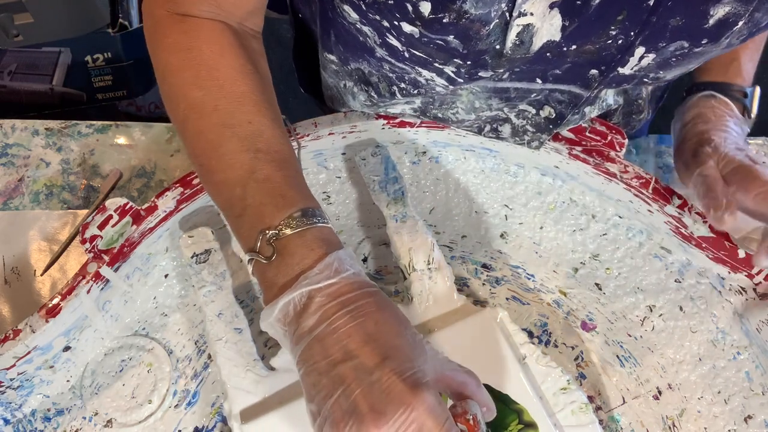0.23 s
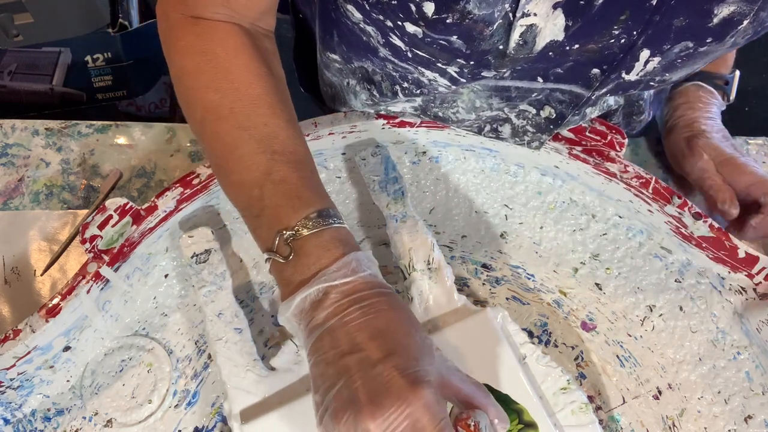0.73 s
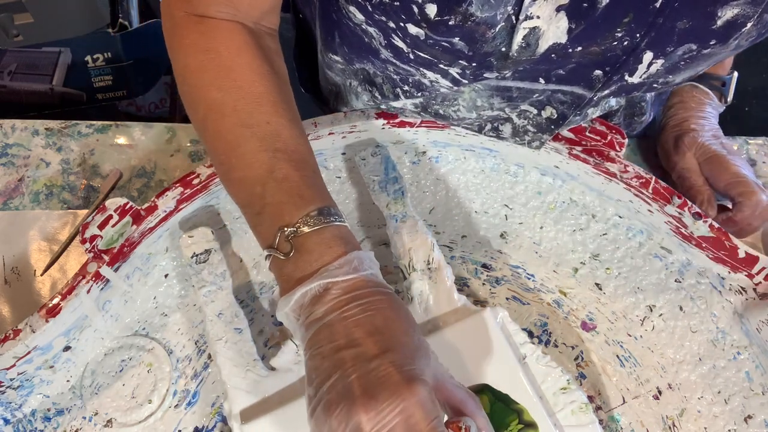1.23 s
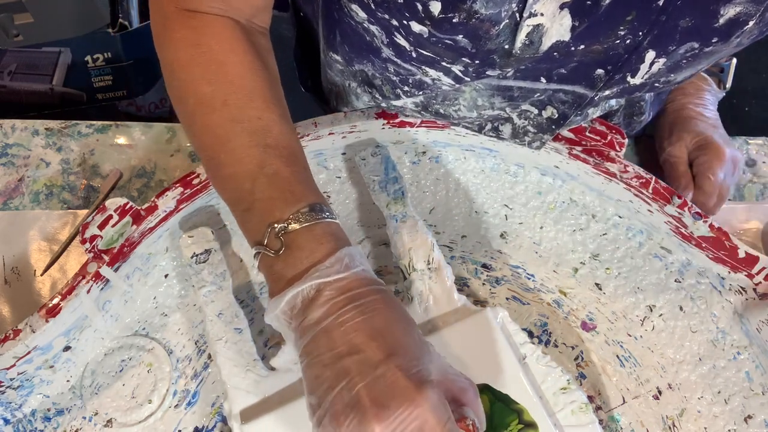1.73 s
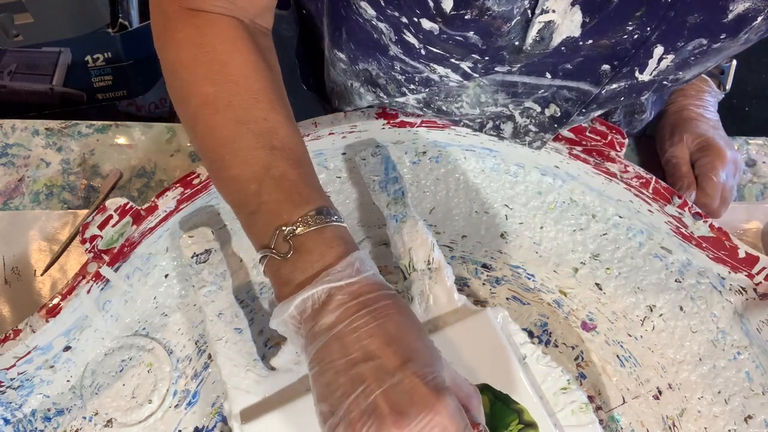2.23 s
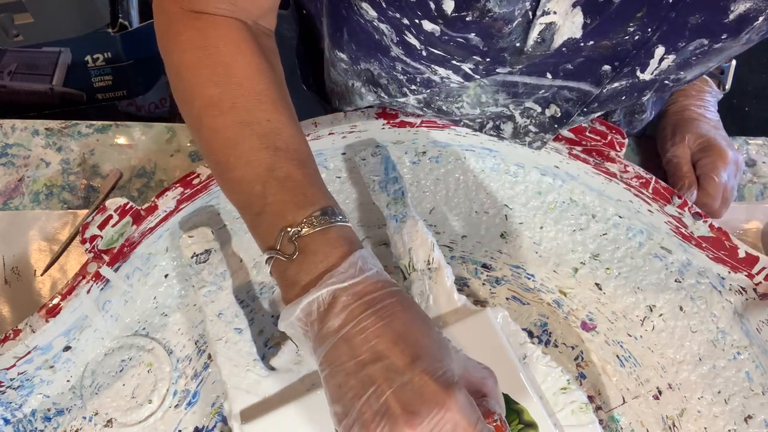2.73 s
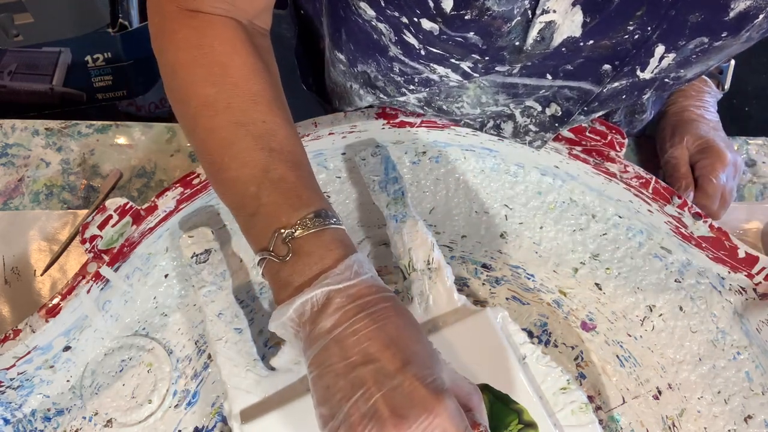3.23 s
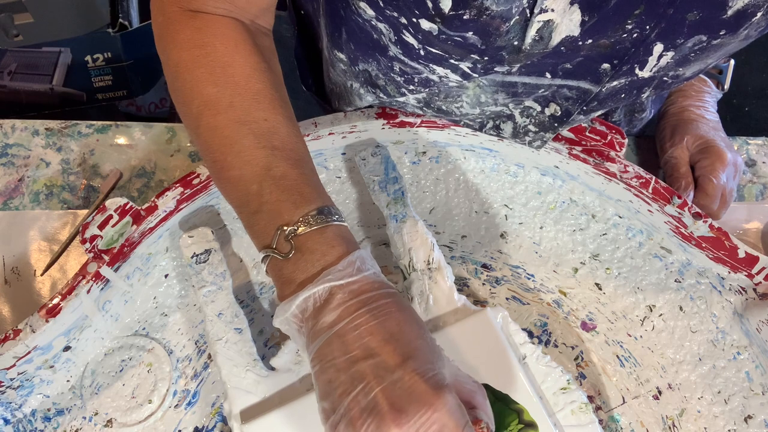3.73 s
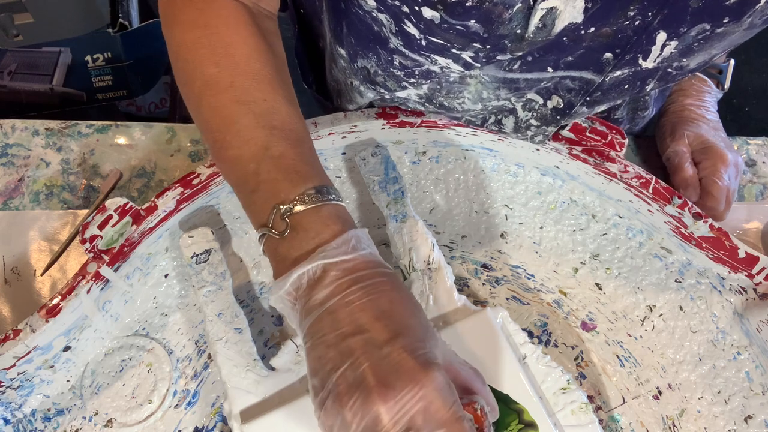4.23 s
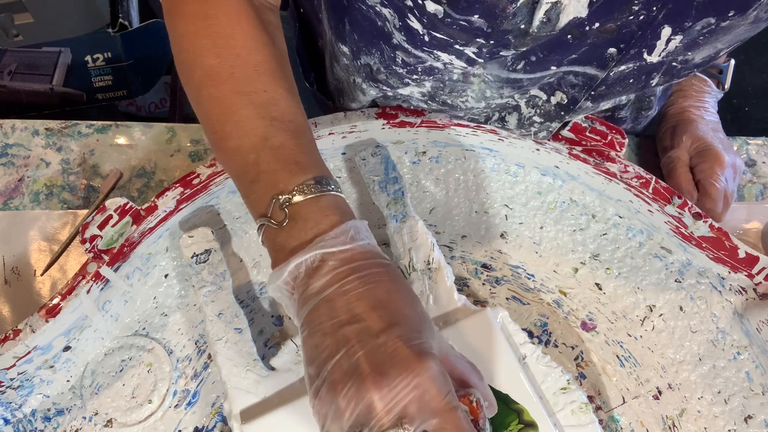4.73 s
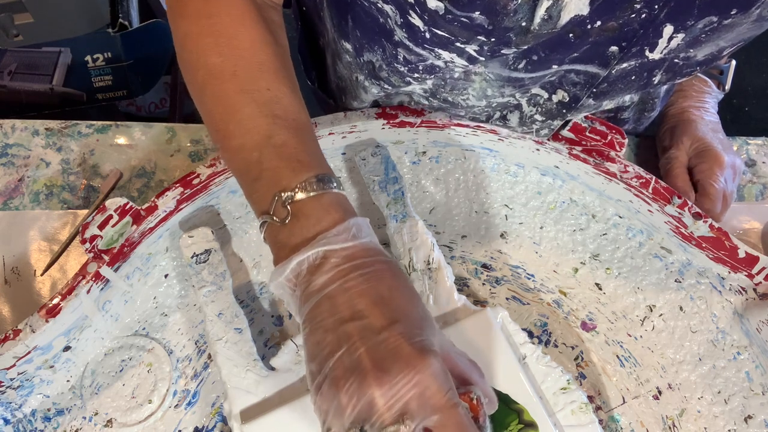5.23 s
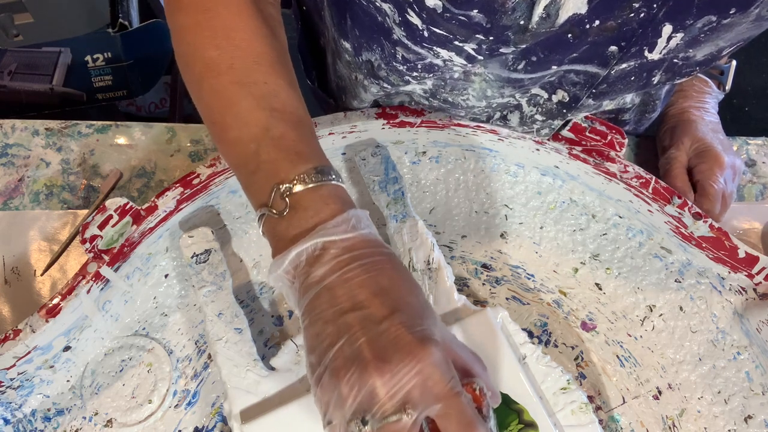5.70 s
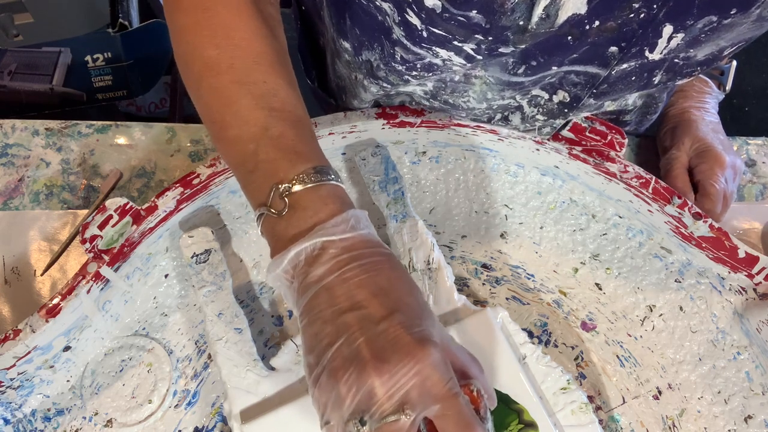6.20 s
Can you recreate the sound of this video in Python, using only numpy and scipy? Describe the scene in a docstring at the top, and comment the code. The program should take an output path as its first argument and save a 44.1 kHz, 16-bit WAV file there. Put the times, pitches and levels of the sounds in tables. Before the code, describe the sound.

A tiny handheld blower whirrs and whines steadily up close in a small room, with airy rush, two faint hand bumps and one ringing click.

```python
"""A tiny handheld blower whirrs and whines at about 151 turns a second, steadily, close over a wet canvas.
Its rotor sounds at multiples (orders) of the turn rate; they trade strength with speed, dips and a new aim.
Filtered noise makes the air: rush and rings in the housing, nozzle hiss, a breathy whistle, a rough band.
Behind it another fan hums low over the rumble of a small room.
The free hand bumps the table softly twice, and a small hard object chatters down with a ringing click."""
import sys
import numpy as np
from scipy import signal
from scipy.fft import rfft, irfft, next_fast_len
from scipy.io import wavfile
from scipy.ndimage import uniform_filter1d, map_coordinates

SR = 44100
rng = np.random.default_rng(int(sys.argv[2]) if len(sys.argv) > 2 else 0)


def unload_audio(sound):
    """Save the sound as a 16-bit wav file, at the path given as the first command line argument."""
    columns = np.transpose(np.atleast_2d(sound))
    # keep every value between -1 and 1, then stretch to whole-number steps
    steps = np.round(np.clip(columns, -1, 1) * 32767)
    wavfile.write(sys.argv[1], SR, steps.astype(np.int16))


N = 284883

# rumble of the room, before stereo placement: pitch_hz, density_db_per_hz
ROOM_RUMBLE = [(12, -120), (25, -106), (35, -83), (50, -81.5), (59, -70.5), (85, -75.5), (105, -74.5),
               (125, -73.5), (150, -78.5), (175, -85.5), (290, -89.5), (380, -97.5), (600, -102)]
# hum of the other fan: time_s, pitch_hz
FAN_HUM = [(0.0, 70.3), (2.25, 70.5), (2.34, 72.64), (6.46, 72.15)]
# stereo image: pitch_hz, left_right_likeness (0 to 1), left_lag_ms, left_minus_right_db
STEREO = [(70, .98, 0, 2.1), (150, .88, 0, 2.4), (300, .7, .12, 0), (800, .9, .11, -2.2),
          (1500, .92, .09, -2), (1750, .7, .09, -1.5), (2050, .5, -.29, -1), (3200, .4, -.265, -.6),
          (4500, .25, -.265, -.4), (6000, .4, -.265, -.4), (7500, .85, -.265, -.2),
          (15000, .92, -.265, -.2)]

# soft bumps of the free hand on the table: start_s, onset_level_db (rms)
HAND_BUMPS = [(.774, -51), (1.335, -56)]
# colour of a bump: pitch_hz, relative_level_db
THUD_COLOUR = [(60, -32), (200, -9), (400, 0), (700, -2), (2000, -24), (8000, -45)]
BUMP_T60_S = 0.25

# contacts of the object as it lands and rattles: start_s, relative_level_db
CONTACTS = [(1.1077, -29), (1.1084, -20.5), (1.1094, -23), (1.1113, -24), (1.1124, -30), (1.1174, -29.5),
            (1.1186, -33), (1.127, -34), (1.139, -39)]
# colour of each snap: pitch_hz, relative_level_db
SNAP_COLOUR = [(60, -40), (250, -13), (450, -4.5), (800, -7), (2200, -4), (4200, -8.5), (5600, -11),
               (7400, -.5), (9000, -1), (11000, 4), (13000, -1), (15500, -4)]
# ringing modes of the object: pitch_hz, relative_level_db, t60_s
OBJECT_RINGS = [(2040, 2.5, 0.16), (3120, 5.5, 0.15), (6220, -6, 0.34), (6519, -9, 0.21), (7370, -2, 0.16),
                (8620, -1, 0.15), (10270, -15, 0.075), (10780, -14, 0.11), (11350, -15, 0.29),
                (11870, -12, 0.2)]
CONTACT_TRIM_DB, RING_TRIM_DB, ECHO_ONSET_DB = 0.8, -40, -31.5
CONTACT_T60_S, ROOM_T60_S = 0.01, 0.17

# air rushing through the housing, before trim and stereo: pitch_hz, density_db_per_hz
AIR_RUSH = [(40, -120), (200, -90), (650, -89), (800, -82), (1000, -76), (1250, -74), (1450, -79),
            (1540, -76.5), (1640, -81), (1750, -87), (2100, -84), (2400, -91.5), (3200, -90.5), (3700, -92),
            (5000, -102), (7000, -106)]
# nozzle hiss, before throb and stereo: pitch_hz, density_db_per_hz
NOZZLE_HISS = [(1000, -130), (3000, -103), (5200, -91), (6300, -94.5), (7400, -98), (8700, -95),
               (10000, -100), (11100, -96.5), (12000, -104), (13800, -106), (15700, -103)]
# housing resonances, before flow and stereo: pitch_hz, spread_hz, level_db (rms)
HOUSING_RINGS = [(495, 41, -70.5), (898, 3.6, -60.5), (1240, 26, -53.5), (1367, 49, -45), (1940, 47, -61.5)]
# flow through the housing: db_per_turn_per_s above cruise, turn_gain_db, dip_gain_db per unit depth
FLOW_GAINS = (0.058, 3.15, -0.61)
RUSH_TRIM_DB, FLOW_TRIM_DB = 0.8, -1
# treble flicker: the depth is full from the given pitch upwards
FLICKER_DB, FLICKER_RATE_HZ, FLICKER_FULL_HZ = 2.4, 8, 2200
# breathy whistle: pitch_hz, spread_hz, level_db (rms before swells), turn_gain_db
BREATHY_WHISTLE = (2732, 50, -68.5, 7)
GUST_DB, GUST_RATE_HZ = 2, 9
# rough band of the jet: pitch_hz, spread_hz, peak_level_db (rms), peak_time_s, half_length_s
JET_FLARE = (4200, 155, -61, 2, 3.5)

# rotor speed: time_s, turns_per_s
ROTOR_SPEED = [(0.0, 152.4), (0.2, 152.3), (0.68, 150.4), (1.28, 151.9), (1.72, 150.0), (2.25, 151.0),
               (2.42, 150.7), (2.79, 153.3), (2.92, 150.9), (3.65, 150.9), (3.8, 150.3), (4.17, 150.5),
               (4.7, 152.2), (5.0, 152.6), (5.5, 151.2), (6.1, 152.0), (6.46, 151.9)]
CRUISE_HZ = 151.3
# the hand turns the blower to a new aim
TURN_START_S, TURN_LENGTH_S = 3.8, 1
# nozzle dips towards the canvas: centre_s, half_length_s, depth (no unit)
NOZZLE_DIPS = [(1.803, 0.11, 0.72), (2.664, 0.11, 0.86)]
# momentary swells and fades of some orders: order, spread_orders, centre_s, half_length_s, change_db
ORDER_SWELLS = [(9, 0.4, 0.5, 0.25, -1.9), (25, 0.4, 0.55, 0.1, 5), (26, 0.4, 1.0, 0.15, 7),
                (18, 0.4, 1.19, 0.07, 6), (10, 0.4, 1.2, 0.25, -3.7), (19, 1.5, 1.4, 0.2, 6),
                (46, 1.5, 1.5, 0.25, 5), (18, 0.4, 1.62, 0.2, 5), (24, 0.4, 1.6, 0.1, 4),
                (8, 0.4, 1.8, 0.15, -7.6), (10, 0.4, 2.0, 0.25, -2.8), (29, 0.8, 2.05, 0.1, 8),
                (48, 0.4, 2.2, 0.25, 6), (7, 0.4, 2.3, 0.4, 3.9), (24, 0.4, 2.3, 0.25, 6),
                (29, 0.8, 2.4, 0.15, 8), (8, 0.4, 2.5, 0.15, -7.7), (28, 0.8, 2.9, 0.15, 7),
                (9, 0.4, 3.1, 0.15, -4.7), (41, 1.5, 3.2, 0.25, 6.6), (26, 0.8, 3.2, 0.2, 6),
                (36, 1.5, 3.33, 0.16, 8.5), (11, 0.4, 3.6, 0.15, -5.2), (29, 1.2, 3.6, 0.17, 9),
                (10, 0.4, 3.7, 0.25, 4.2), (25, 0.8, 4.1, 0.07, 6), (39, 1.5, 4.2, 0.4, 6),
                (18, 0.8, 4.5, 0.45, 6), (34, 1.5, 4.4, 0.25, 6.5), (10, 0.4, 4.9, 0.25, -5.1),
                (18, 0.4, 5.05, 0.07, -12), (18, 0.4, 5.62, 0.07, -6), (29, 0.4, 5.7, 0.4, 9),
                (18, 0.4, 5.88, 0.07, -7)]

# high orders before trim and swells: order, shared_level_db (rms), opposed_level_db (rms),
# db_per_turn_per_s above cruise, turn_gain_db, dip_gain_db per unit depth
HIGH_ORDERS = [(12, -68, -66, -1, -1, 4), (13, -64.5, -67, -1, -2, -8), (14, -73, -66, 0, -4, 4),
               (16, -75, -71, 0, 3, -2), (18, -72, -64, -1, 10, 6), (19, -75, -61, -3, -1, 4),
               (20, -73, -65, -1, 4, 6), (21, -71, -65, 2, 6, -3), (22, -70, -69, 2, 0, -8),
               (23, -70, -62, -2, -5, 2), (24, -67, -69, -1, -2, 4), (25, -63.5, -65, -1.3, -4, 3),
               (26, -65, -74, -1, -2, -5), (27, -69, -71, 2, 4, 4), (28, -67, -66, -2, 2, 2),
               (29, -65, -66, 0, -7, -4), (30, -72, -74, -1, 2, 6), (31, -72, -70, -1, 5, 11),
               (32, -73, -67, 3, 6, 2), (33, -70, -68, -3, 4, -2), (34, -73, -66, -1, 4, -1),
               (35, -66, -64, -2, -2, -6), (36, -70, -71, -2, 4, 10), (37, -71, -74, 0, 3, -2),
               (38, -76, -73, 0, 3, 0), (39, -76, -72, -2, 9, -5), (40, -73, -74, 1, -3, 2),
               (41, -68, -74, -1, 1, -1), (42, -75, -82, 0, -2, -2), (43, -71, -76, 0, 2, 0),
               (45, -68, -72, -2, 6, -8), (46, -71, -81, 2, -1, -11), (47, -71, -83, 2, -6, -2),
               (48, -71, -84, 1, -2, -3), (49, -69, -84, -1, -2, 4), (50, -70, -83, 0, 2, -7)]
# top orders, before spread, fading and stereo: pitch_hz, level_db (rms of each order)
TOP_ORDERS = [(7700, -72), (8200, -69), (10600, -72), (11100, -76), (11350, -66), (11600, -76),
              (12600, -81), (13400, -77), (15500, -74.5)]
WHINE_TRIM_DB, TOP_FADE_DB = 1.7, 3.8
# reflections and flow flutter, each as strength against a steady arrival of 1
WANDER, WANDER_RATE_HZ = 0.68, 6.5
FLUTTER, FLUTTER_RATE_HZ = 0.46, 25
# neighbouring orders swell and fade together
PATCH_DB, PATCH_RATE_HZ = 1.4, 5.5

# strong low orders before swells: order, level_db (rms), left_minus_right_db,
# db_per_turn_per_s above cruise, turn_gain_db, dip_gain_db per unit depth
STRONG_ORDERS = [(6, -54, 0, 1, -15.5, 12.5), (7, -44.5, 0, -0.2, -4.5, -3), (8, -56, -6, -2, 4, 5),
                 (9, -43, -1.5, 0.5, 2, -4), (10, -45.5, 4, -2, 2.5, -7), (11, -60.5, -3.5, 4, 9, 8)]
# the housing smears the pulse: its delay grows by this share of a turn from one order to the next
SMEAR_TURNS = 0.29


def from_db(db):
    """Turn decibels into gain."""
    return 10 ** (np.asarray(db) / 20)


def rms_one(x):
    """Level the whole array to rms 1."""
    return x / np.sqrt(np.mean(np.abs(x) ** 2) + 1e-20)


def in_time(rows, count=N):
    """Read the columns of a curve at evenly spaced moments."""
    s, *columns = np.transpose(rows)
    moments = np.linspace(0, N / SR, count)
    return [np.interp(moments, s, column) for column in columns]


def at_hz(rows, hz):
    """Read the columns of a spectrum along a log-frequency axis."""
    knots, *columns = np.transpose(rows)
    log_hz = np.log(np.maximum(hz, 1))
    return [np.interp(log_hz, np.log(knots), column) for column in columns]


def drift(rate_hz, count=N, size=1):
    """Rows of smooth random movement with rms 1, from noise softened above the given rate."""
    hz = np.arange(count // 2 + 1) * SR / N
    noise = rfft(rng.standard_normal((size, count)))
    return rms_one(irfft(noise / (1 + (hz / rate_hz) ** 2), count))


def stereo_gains(hz):
    """Likeness of the two sides, and the complex left and right gains that place each frequency."""
    alike, lag_ms, pan_db = at_hz(STEREO, hz)
    left = from_db(pan_db / 2) * np.exp(-1j * np.pi * hz * lag_ms / 1000)
    return np.clip(alike, 0, 1), np.array([left, 1 / left])


def air_noise(shape):
    """Turbulent stereo noise shaped by gain per root Hz: a direct part shared, a diffuse part for each side."""
    size = next_fast_len(N)
    hz = np.arange(size // 2 + 1) * SR / size
    alike, sides = stereo_gains(hz)
    white = rfft(rng.standard_normal((3, size)))
    direct = np.sqrt(alike) * white[0]
    diffuse = np.sqrt(1 - alike) * white[1:]
    spectrum = (direct + diffuse) * sides * shape(hz) * np.sqrt(SR / 2)
    return irfft(spectrum, size)[:, :N]


def coloured(spectrum):
    """Stereo noise that follows a listed spectrum."""
    return air_noise(lambda hz: from_db(at_hz(spectrum, hz)[0]))


def dying(start_s, db, t60_s):
    """A sudden onset and an exponential fall of 60 dB per t60."""
    age_s = np.arange(N) / SR - start_s
    return (age_s >= 0) * from_db(db - 60 * np.clip(age_s / t60_s, 0, 4))


def handling(speed):
    """Three controls over time: turns/s above cruise, share of the turn done, depth of the dip."""
    t = np.arange(N) / SR
    turned = np.clip((t - TURN_START_S) / TURN_LENGTH_S, 0, 1)
    dipped = sum(depth * np.exp(-((t - s) / length) ** 2) for s, length, depth in NOZZLE_DIPS)
    return np.array([speed - CRUISE_HZ, turned, dipped])


def order_swell_db(order, count=N):
    """Passing swells of one order in dB, each a soft bell across time and neighbouring orders."""
    t = np.linspace(0, N / SR, count)
    swell = 0
    for centre, spread, s, length, db in ORDER_SWELLS:
        swell = swell + db * np.exp(-((order - centre) / spread) ** 2 - ((t - s) / length) ** 2)
    return swell


def room_fan(level_db=-50.0, waver_db=0.3, mains_db=-62):
    """The other fan's wavering hum and a faint mains tone, two sines over the noise rumble of the room."""
    hz, = in_time(FAN_HUM)
    hum = np.sin(2 * np.pi * np.cumsum(hz) / SR) * from_db(level_db + waver_db * drift(3.1))
    mains = np.sin(2 * np.pi * 60 * np.arange(N) / SR) * from_db(mains_db)
    balance = np.abs(stereo_gains(hz.mean())[1])[:, None]
    return balance * np.sqrt(2) * (hum + mains) + coloured(ROOM_RUMBLE)


def bumps():
    """Dull noise thuds of the hand on the table, each dying away exponentially."""
    envelope = sum(dying(s, db, BUMP_T60_S) for s, db in HAND_BUMPS)
    return envelope * rms_one(coloured(THUD_COLOUR))


def click():
    """A small hard object chatters down: dry noise snaps, the object's ringing modes and a room tail."""
    # independent contacts add in power
    contacts = np.sqrt(sum(dying(s, db + CONTACT_TRIM_DB, CONTACT_T60_S) ** 2 for s, db in CONTACTS))
    landing_s, t = CONTACTS[1][0], np.arange(N) / SR
    ring = 0
    for hz, db, t60_s in OBJECT_RINGS:
        tone = np.sin(2 * np.pi * (hz * t + rng.random((2, 1))))
        ring = ring + dying(landing_s, RING_TRIM_DB + db, t60_s) * tone
    # the walls return less treble
    tail = signal.lfilter([.7, .3], [1], coloured(SNAP_COLOUR))
    echo = dying(landing_s, ECHO_ONSET_DB, ROOM_T60_S) * rms_one(tail)
    return contacts * rms_one(coloured(SNAP_COLOUR)) + ring + echo


def flare():
    """A rough, narrow band of jet turbulence that swells and fades once."""
    centre, width, db, s, length = JET_FLARE
    band = rms_one(air_noise(lambda hz: 1 / (1 + ((hz - centre) / width) ** 2) ** 2))
    return band * from_db(db) * np.exp(-((np.arange(N) / SR - s) / length) ** 2)


def whistle(moves):
    """A narrow breathy band at the nozzle, gusting; it swells with the nearest order and with the turn."""
    centre, width, db, turn_db = BREATHY_WHISTLE
    band = rms_one(air_noise(lambda hz: 1 / (1 + ((hz - centre) / width) ** 2)))
    order_db = order_swell_db(round(centre / CRUISE_HZ))
    return band * from_db(db + turn_db * moves[1] + order_db + GUST_DB * drift(GUST_RATE_HZ))


def housing():
    """Turbulence rings the cavities of the housing: noise shaped into resonant peaks."""
    def shape(hz):
        """Sum the peaks in power."""
        power = 0
        for centre, width, db in HOUSING_RINGS:
            peak = 1 / (1 + ((hz - centre) / width) ** 2) ** 2
            power = power + from_db(db) ** 2 / (np.pi * width / 2) * peak
        return np.sqrt(power)
    return air_noise(shape)


def nozzle(turns, throb=.58, flicker_db=.2):
    """The jet hisses as coloured noise, pulsing once with each turn."""
    pulse = 1 + throb * np.cos(2 * np.pi * turns)
    return coloured(NOZZLE_HISS) * pulse * from_db(flicker_db * drift(30))


def patchy(x, size=1024, smooth_bins=8):
    """The treble of the air flickers in narrow patches; the bass stays almost even."""
    hz, s, bands = signal.stft(x, SR, nperseg=size)
    movement = drift(FLICKER_RATE_HZ, count=len(s), size=len(hz))
    patches = rms_one(uniform_filter1d(movement, size=smooth_bins, axis=0))
    depth = np.minimum(hz / FLICKER_FULL_HZ, 1)[:, None] ** 2
    gain = from_db(FLICKER_DB * depth * patches)
    # every frequency keeps its mean power gain at 1
    gain = gain / np.sqrt(np.mean(gain ** 2, axis=1, keepdims=True))
    return signal.istft(bands * gain, SR, nperseg=size)[1][:, :N]


def whine(turns, moves, top_spread_db=1.53, count=320, size=4096, top_order=103):
    """Each turn plays one cycle of a buzz of high orders; wandering reflections reshape it over time."""
    phases = np.exp(2j * np.pi * rng.random((top_order + 1, 1)))

    def paths(orders, arrival=1):
        """A steady arrival plus wandering reflections and flutter, at rms 1 for each order."""
        def movement(rate_hz):
            """Random movement for every order."""
            return drift(rate_hz, count=count, size=len(orders))
        slow = rms_one(movement(WANDER_RATE_HZ) + 1j * movement(WANDER_RATE_HZ))
        fast = rms_one(movement(FLUTTER_RATE_HZ) + 1j * movement(FLUTTER_RATE_HZ))
        total = arrival * phases[orders] + WANDER * slow + FLUTTER * fast
        patches = rms_one(uniform_filter1d(movement(PATCH_RATE_HZ), size=3, axis=0))
        total = total * from_db(PATCH_DB * patches)
        return total / np.sqrt(np.mean(np.abs(total) ** 2, axis=1, keepdims=True))

    listed, mid_db, side_db, *responses = np.transpose(HIGH_ORDERS)
    low = listed.astype(int)
    moments = np.linspace(0, N - 1, count).astype(int)
    swell_db = np.transpose(responses) @ moves[:, moments]
    swell_db = swell_db + np.array([order_swell_db(k, count=count) for k in low])
    # the lag between the sides puts the opposed part a quarter cycle off; it swells half as much
    quarter = 1j * np.sign(np.imag(stereo_gains(low * CRUISE_HZ)[1][0] ** 2))[:, None]
    mid = from_db(mid_db[:, None] + swell_db + WHINE_TRIM_DB) * paths(low)
    side = from_db(side_db[:, None] + swell_db / 2 + WHINE_TRIM_DB) * paths(low, quarter)
    lines = np.zeros((2, size // 2 + 1, count), complex)
    lines[:, low] = mid + side, mid - side

    # the highest orders leave by the nozzle; their short waves fade in and out more deeply
    high = np.arange(low.max() + 1, top_order + 1)
    hz = high * turns[-1] * SR / N
    high_db = at_hz(TOP_ORDERS, hz)[0] + top_spread_db * rng.standard_normal(len(high))
    fading = rms_one(from_db(TOP_FADE_DB * drift(WANDER_RATE_HZ, count=count, size=len(high))))
    placed = (stereo_gains(hz)[1] * from_db(high_db))[:, :, None]
    lines[:, high] = placed * paths(high) * fading

    # read the slowly changing one-turn waveform at the rotor's angle
    one_turn = irfft(lines, size, axis=1) * size / np.sqrt(2)
    where = [turns % 1 * size, np.linspace(0, count - 1, N)]
    return np.array([map_coordinates(side, where, order=1, mode="grid-wrap") for side in one_turn])


def whirr(turns, moves, flutter_db=.9, sway_db=1.1, shaft_db=-64):
    """Shaft tone and strong low orders as sines locked to the rotor, swaying and fluttering in level."""
    # the shaft tone, a faint low hum at about the turn rate
    levels = [(0.99, shaft_db, 0)]
    for k, db, pan, *response in STRONG_ORDERS:
        levels.append((round(k), db + np.dot(response, moves), pan))
    out = 0
    for k, db, pan in levels:
        sides = stereo_gains(k * turns[-1] * SR / N)[1] * from_db([pan / 2, -pan / 2])
        tone = np.exp(2j * np.pi * k * (turns - SMEAR_TURNS * k / 2))
        gain = from_db(db + order_swell_db(k) + sway_db * drift(3.5) + flutter_db * drift(23))
        out = out + gain * np.real(sides[:, None] * tone)
    return np.sqrt(2) * out


def scene(jitter=.0007):
    """The rotor's slightly unsteady speed drives the whirr, whine and throb; handling sets their strengths."""
    speed, = in_time(ROTOR_SPEED)
    turns = np.cumsum(speed * (1 + jitter * drift(16.7)[0])) / SR
    moves = handling(speed)
    flow = from_db(FLOW_TRIM_DB + np.dot(FLOW_GAINS, moves))
    jet = patchy(from_db(RUSH_TRIM_DB) * coloured(AIR_RUSH) + nozzle(turns))
    air = jet + flow * housing() + whistle(moves) + flare()
    background = room_fan() + bumps() + click()
    return background + air + whine(turns, moves) + whirr(turns, moves)


def record(dry):
    """A steep elliptic low-pass cuts the top above 15.75 kHz."""
    return signal.sosfilt(signal.ellip(12, .1, 80, 15750, fs=SR, output="sos"), dry)


dry = scene()
out = record(dry)
unload_audio(out)
```